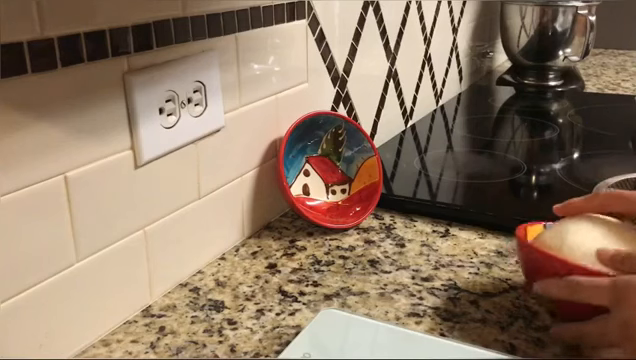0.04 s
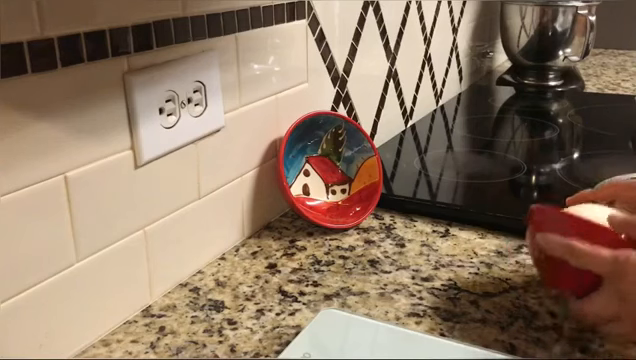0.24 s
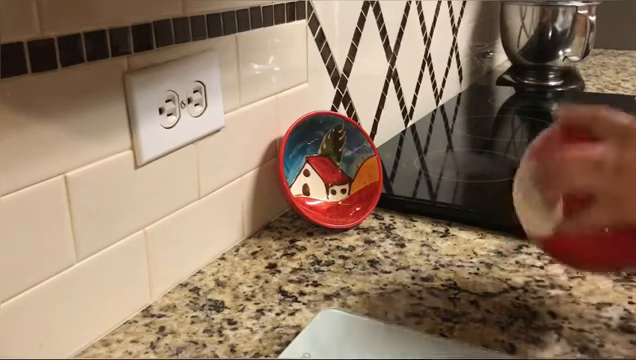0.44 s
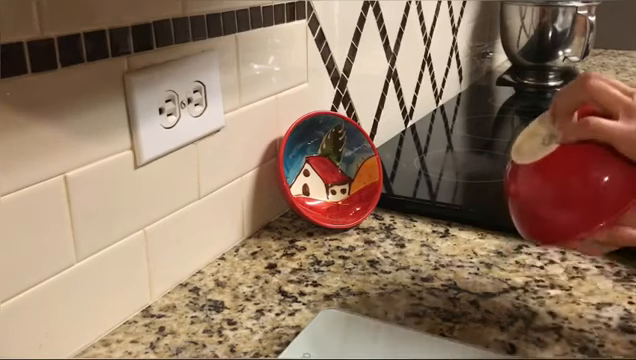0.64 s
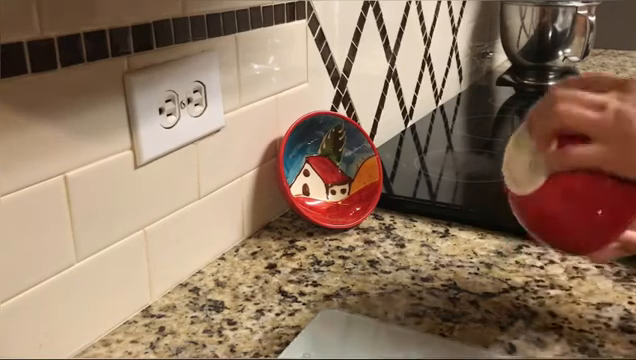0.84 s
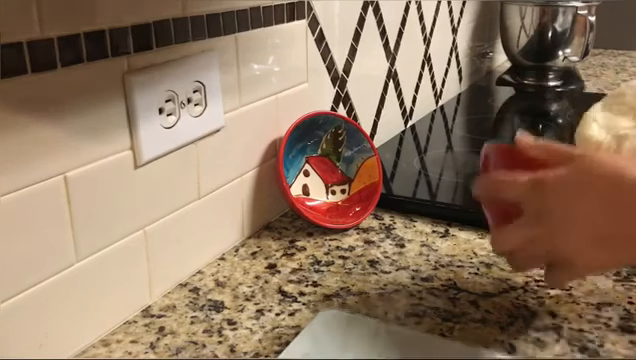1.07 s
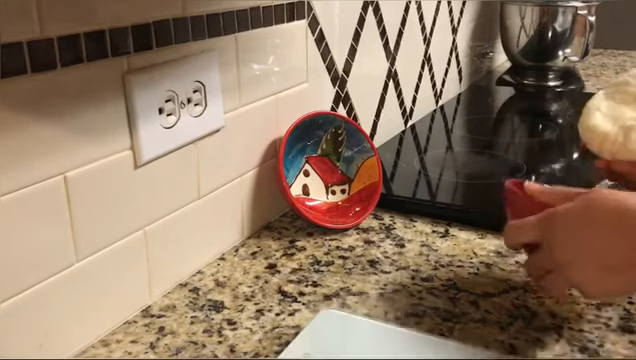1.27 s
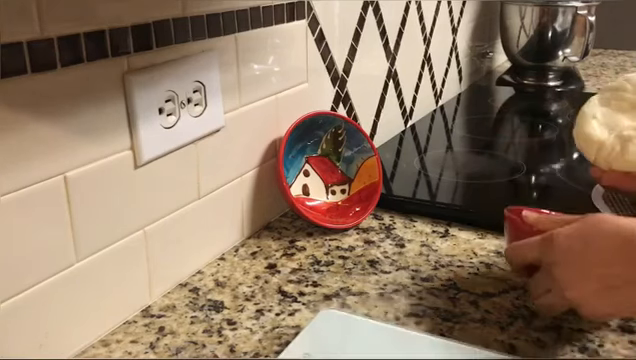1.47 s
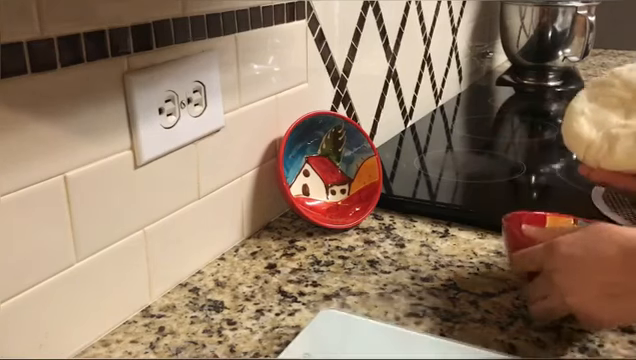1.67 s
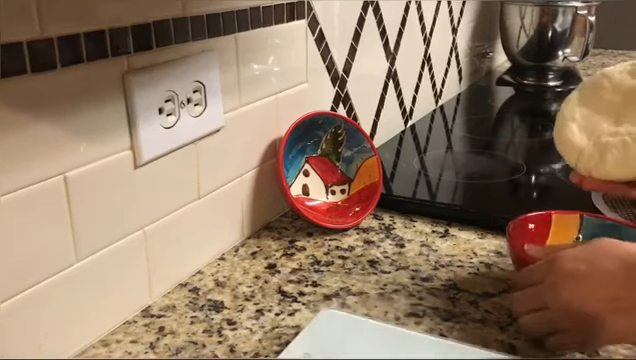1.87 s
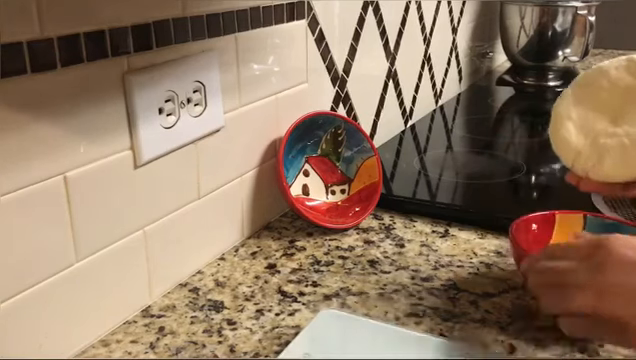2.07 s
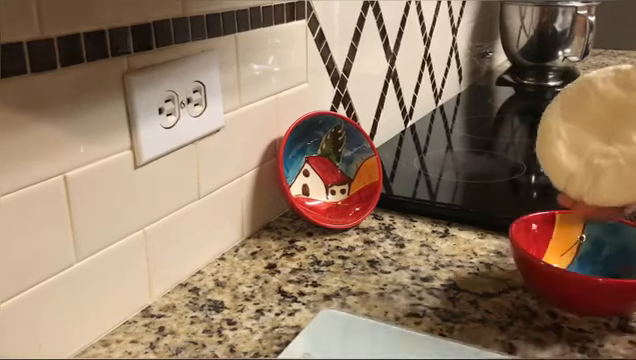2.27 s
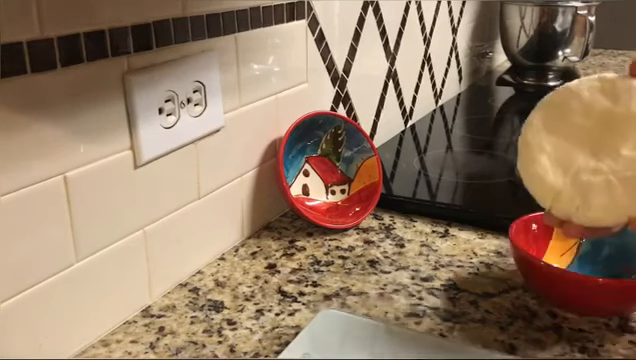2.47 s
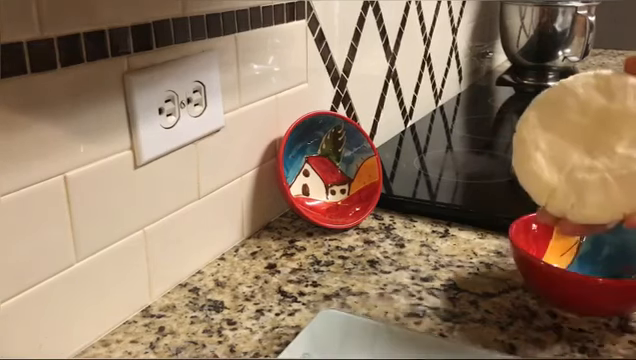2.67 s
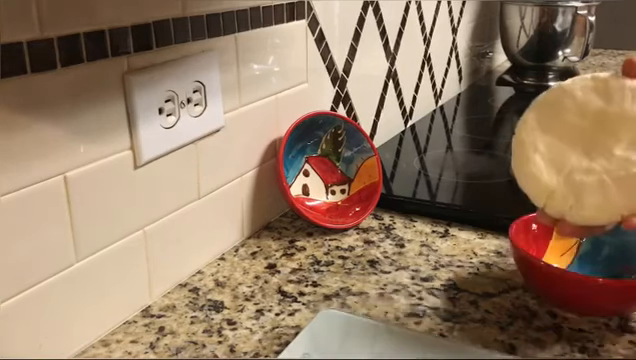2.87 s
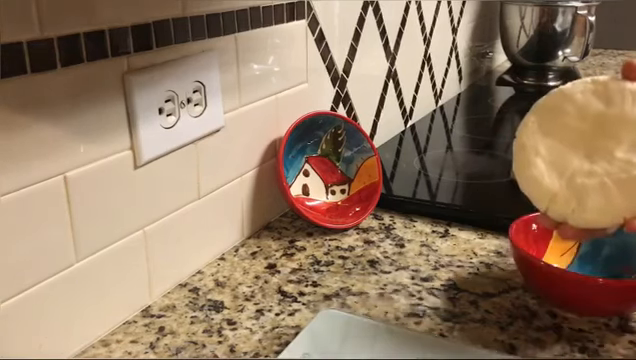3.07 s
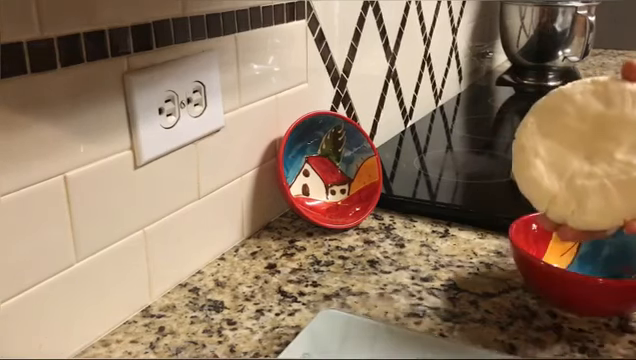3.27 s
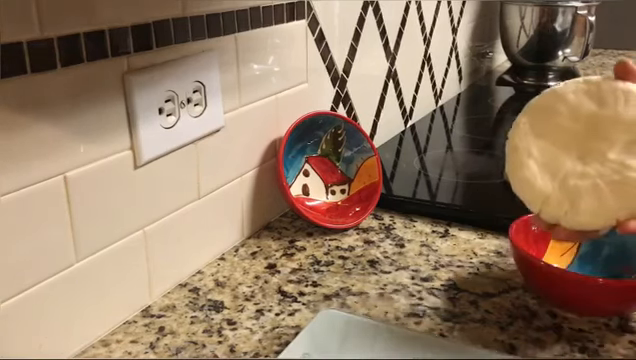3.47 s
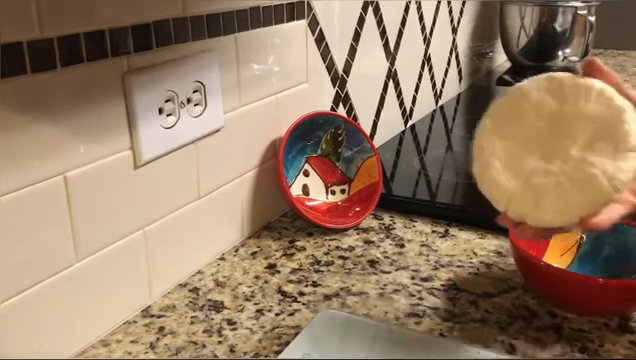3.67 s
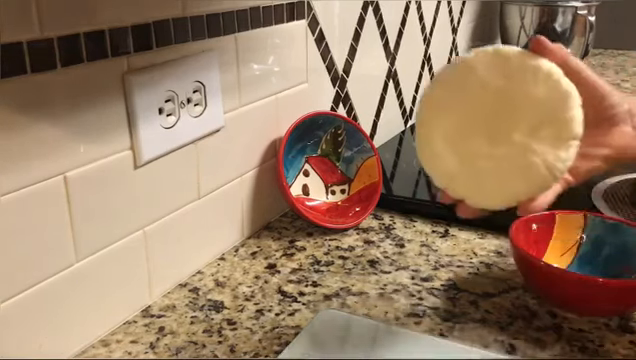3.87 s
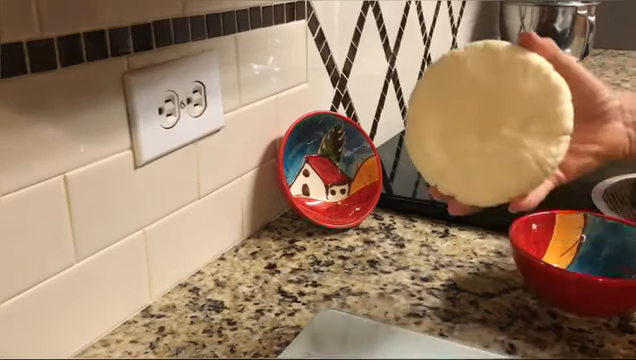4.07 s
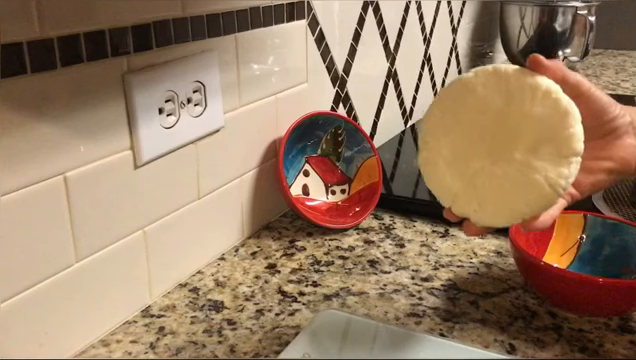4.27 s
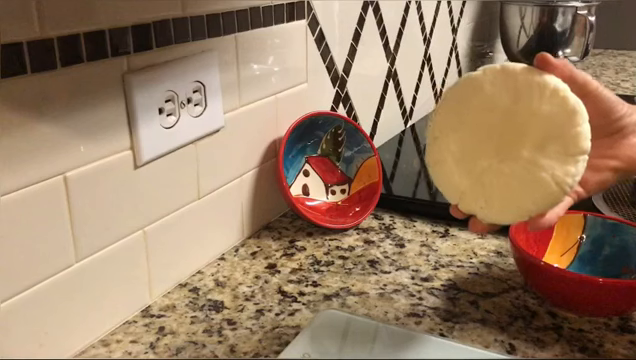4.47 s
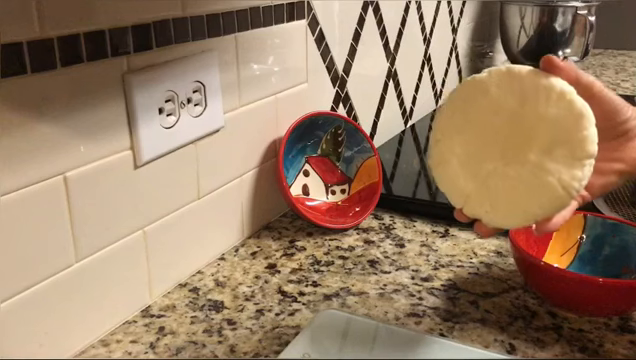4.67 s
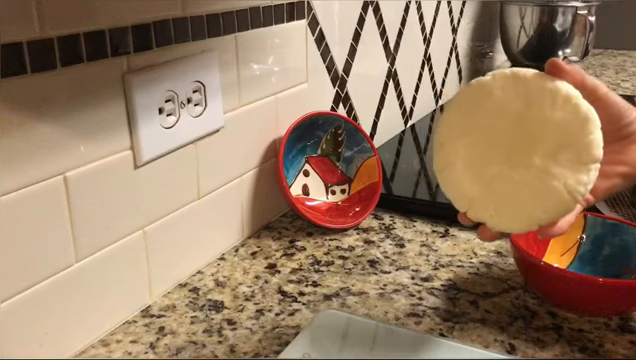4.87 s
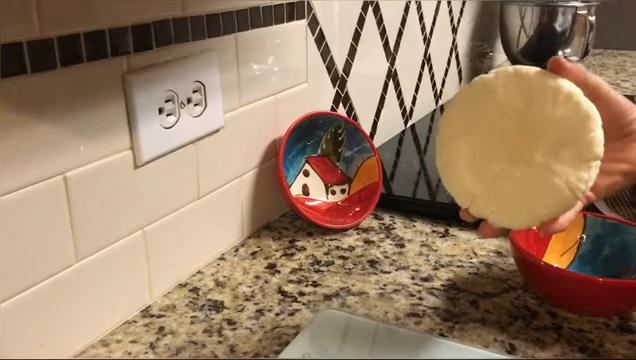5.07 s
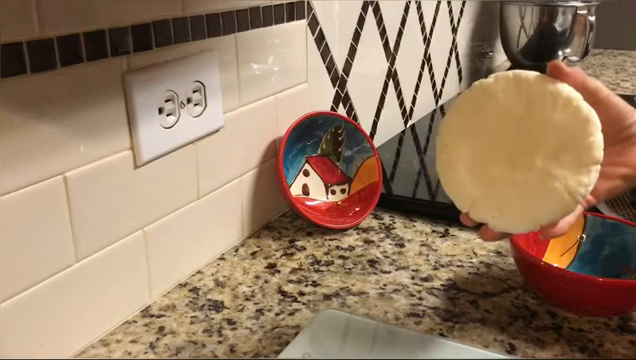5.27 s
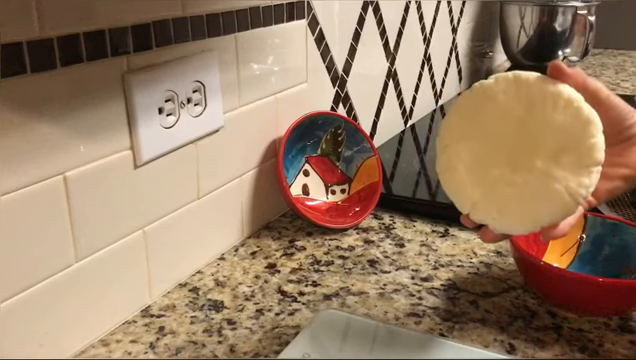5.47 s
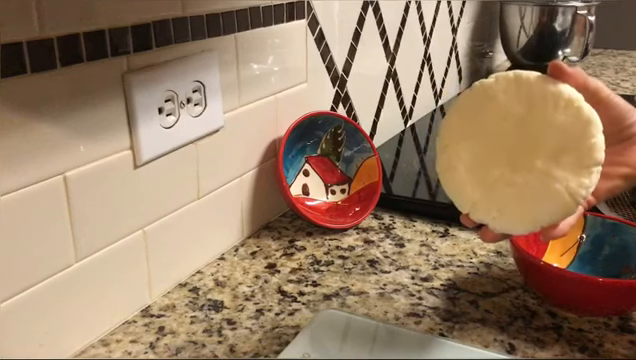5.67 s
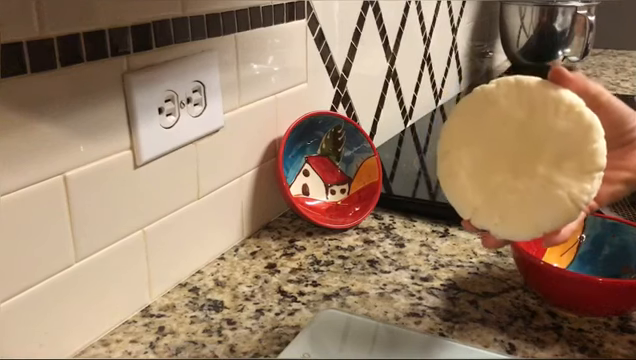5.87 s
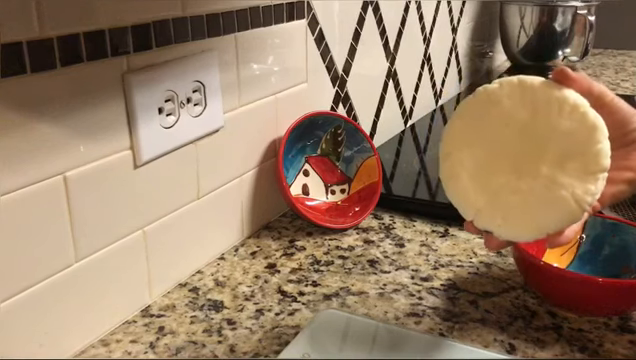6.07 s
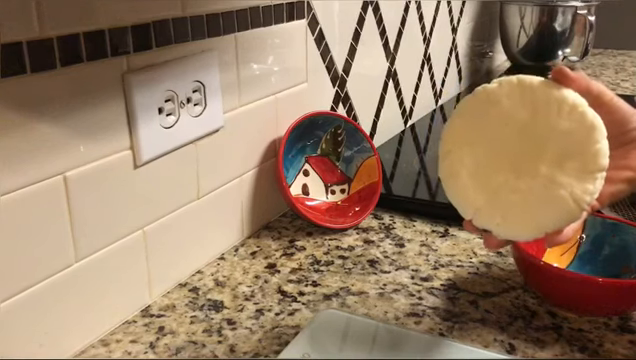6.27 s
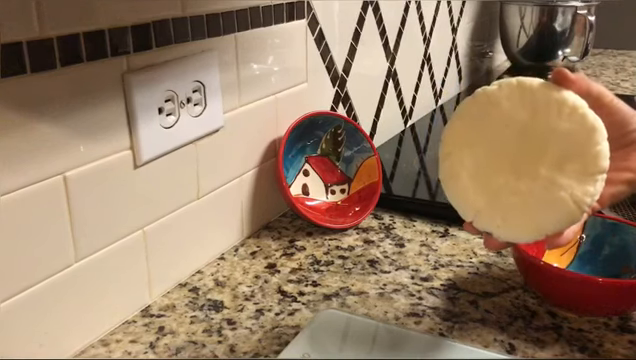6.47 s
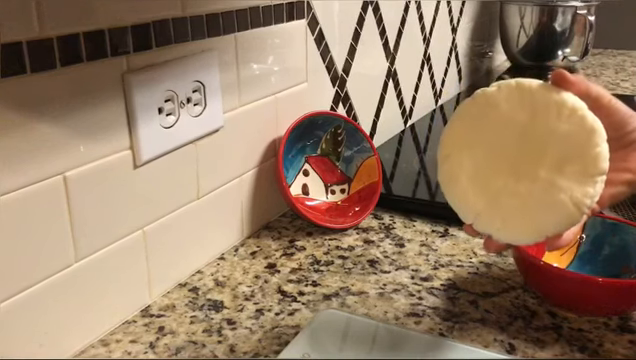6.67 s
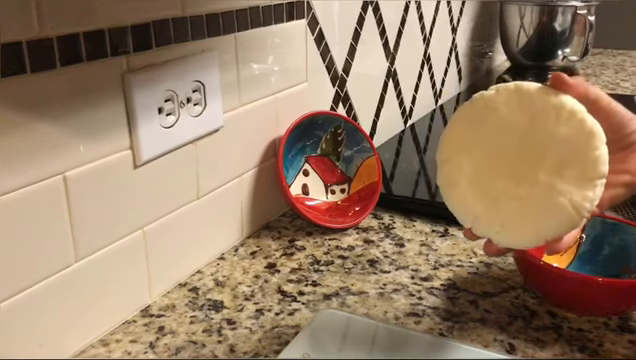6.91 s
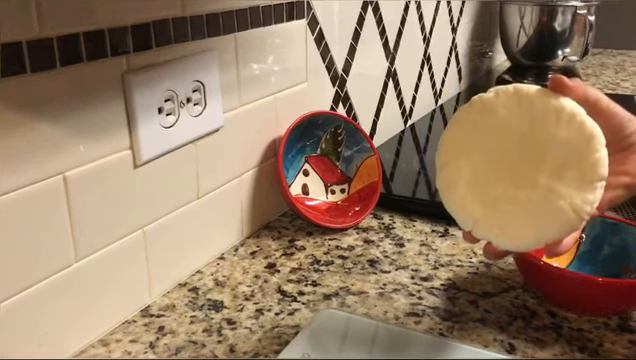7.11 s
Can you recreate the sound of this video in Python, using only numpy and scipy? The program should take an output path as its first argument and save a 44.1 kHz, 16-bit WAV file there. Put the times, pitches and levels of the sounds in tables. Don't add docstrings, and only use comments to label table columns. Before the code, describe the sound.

A ceramic bowl clatters onto a stone counter after soft cheese pops free, with close air puffs, hand rustle, fridge hum and later dry ticks.

```python
import sys
import numpy as np
from scipy import signal
from scipy.fft import rfft, irfft
from scipy.io import wavfile
from scipy.ndimage import uniform_filter1d

SR = 44100
rng = np.random.default_rng(int(sys.argv[2]) if len(sys.argv) > 2 else 0)


def volts_from_db(level):
    exponent = np.asarray(level, float) / 20
    return 10 ** exponent


def output_pcm(signal):
    pcm = np.clip(np.atleast_2d(signal).T, -1, 1) * 32767
    wavfile.write(sys.argv[1], SR, np.round(pcm).astype(np.int16))


N = 314874


def level(x, db):
    return x * volts_from_db(db) / np.sqrt(np.mean(x ** 2))


def band(x, lo_hz, hi_hz, order=2):
    sos = signal.butter(order, [lo_hz, min(hi_hz, .45 * SR)], "band", fs=SR, output="sos")
    return signal.sosfilt(sos, x)


def hiss(lo_hz, hi_hz, size=N):
    return level(band(rng.standard_normal(size), lo_hz, hi_hz), 0)


def fading(size, t60_s):
    return volts_from_db(-60 * np.arange(size) / SR / t60_s)


def dying(size, ms):
    return np.exp(-np.arange(size) / (ms * SR / 1000))


def curve(tables, column):
    t = np.arange(N) / SR
    gain = np.zeros(N)
    for rows in map(np.transpose, tables):
        gain += volts_from_db(np.interp(t, rows[0], rows[column], -200, -200))
    return gain


def swells(rows):
    t = np.arange(N) / SR
    power = np.zeros(N)
    for s, db, rise, fade in rows:
        power += volts_from_db(2 * db) * np.exp(-((t - s) / np.where(t < s, rise, fade)) ** 2)
    return np.sqrt(power)


def wander(rate_hz):
    hold = int(SR / rate_hz)
    steps = np.repeat(rng.standard_normal(N // hold + 1), hold)
    return uniform_filter1d(steps, hold)[:N]


def add(out, s, x):
    i = int(s * SR)
    out[i:i + len(x)] += x[:N - i]


def modes(table, scatter_db, rise_ms=0.33, size=SR // 2):
    hz, db, t60 = np.transpose(table)[:, :, None]
    t = np.arange(size) / SR
    gain = volts_from_db(db + scatter_db * rng.standard_normal(hz.shape))
    gain = gain * (-1) ** (np.arange(len(hz))[:, None] + rng.integers(2))
    tones = gain * np.sin(2 * np.pi * hz * t) * np.exp(-np.log(1000) * t / t60)
    return np.tanh(t * 1000 / rise_ms) * np.sum(tones, axis=0) / np.sqrt(np.sum(gain ** 2))


def burst(ms, size=2048):
    x = rng.standard_normal(size) ** 3 * dying(size, ms)
    return x / np.sqrt(np.sum(x ** 2))


# (f/Hz, level/dB)
MOTOR_TONES = [(49.25, -43.5), (147.74, -58.5), (250, -76), (359.5, -75)]
# (t/s, f/Hz)
SECOND_MOTOR = [(0, 150.22), (2, 150.15), (3.2, 150.34), (7.14, 150.34)]
# (f/Hz, level/dB per Hz)
ROOM_HISS = [(40, -2.5), (70, -1), (110, -11.5), (200, -11.5), (300, -15.5), (360, -13), (440, -22),
             (600, -19.5), (1000, -30), (1700, -32.5), (3000, -39), (9000, -42.5), (15500, -47.5),
             (16200, -69.5)]
# (f/Hz, width/Hz, level/dB)
WHIRS = [(576, 20, -80.5), (907, 39, -83), (1233, 10, -82), (1330, 10, -77), (1380, 120, -82.5),
         (1444, 35, -80), (1530, 22, -89)]


def fridge():
    t = np.arange(N) / SR
    null_s = 4.175
    out = np.zeros(N)
    for hz, db in MOTOR_TONES:
        out += volts_from_db(db) * np.sqrt(2) * np.sin(2 * np.pi * hz * (t - null_s))
    turns = np.cumsum(np.interp(t, *np.transpose(SECOND_MOTOR))) / SR
    turns = turns - np.interp(null_s, t, turns)
    out -= volts_from_db(-61.5) * np.sqrt(2) * np.sin(2 * np.pi * turns)
    hz, db = np.transpose(ROOM_HISS)
    colour = volts_from_db(np.interp(np.log(np.fft.rfftfreq(N, 1 / SR) + 1), np.log(hz), db))
    room = irfft(rfft(rng.standard_normal(N)) * colour, N)
    out += room * volts_from_db(-64.5) / np.std(band(room, 200, 16000))
    for hz, width, db in WHIRS:
        out += volts_from_db(db) * hiss(hz - width / 2, hz + width / 2)
    return out


# (t/s, peak level/dB, build-up/s, fade/s)
GUSTS = [(.08, -30, .2, 0.084), (.36, -24.5, .07, 0.076), (.7, -32, .2, 0.36), (1.2, -32, .12, 0.11),
         (1.95, -36, .12, 0.25), (2.36, -29.5, .2, 0.091), (5.05, -36, .3, 0.074), (5.45, -45.5, .07, .06)]
# (t/s, pressure from -1 to 1, half width/ms)
AIR_SURGES = [(.18, -0.072, 45), (0.311, 0.187, 27), (0.377, 0.4, 25), (0.45, -0.22, 38),
              (0.511, -0.14, 58), (0.641, 0.12, 74), (1.301, -0.13, 51), (1.392, 0.11, 81),
              (2.221, -0.062, 35), (2.329, 0.086, 16), (2.399, -0.0066, 22), (2.482, 0.078, 33)]
# (t/s, drop level/dB, edge/ms, recovery/ms, crack level/dB)
SUCTION_POPS = [
    (0.2237, -12.5, 1.73, 18.5, -73),
    (1.3286, -11, 1.5, 13, -39),
]


def air():
    t = np.arange(N) / SR
    slow = level(band(hiss(4, 20), 3, 28), -0.91)
    still_air = volts_from_db(-44.5 + 4 * wander(3))
    flutter = volts_from_db(-26) * hiss(74, 180)
    out = np.hypot(swells(GUSTS), still_air) * (slow + flutter)
    for s, pressure, ms in AIR_SURGES:
        out += pressure * np.exp(-((t - s) * 1000 / ms) ** 2 / 2)
    for s, db, edge_ms, back_ms, crack_db in SUCTION_POPS:
        u = t[:SR // 2] * 1000
        add(out, s, -volts_from_db(db) * np.tanh((u / edge_ms) ** 2) * np.exp(-u / back_ms))
        crack = band(signal.unit_impulse(2048), 600, 2600, order=1)
        add(out, s + 0.0006, volts_from_db(crack_db + 32) * crack)
    return out


# (t/s, level/dB)
NAIL_SCRAPE = [(.08, -88), (.11, -69), (.15, -90), (.22, -71), (.28, -75), (.3, -69), (.308, -53),
               (.325, -62), (.35, -71)]
# (f/Hz, level/dB, 60 dB fade/s)
FULL_WALL = [(5900, 5, 0.026), (6000, -3, 0.04), (6310, 7, 0.019), (7000, -8, 0.034), (7900, 1, 0.033),
             (9020, 3, 0.042)]
# (t/s, level/dB)
FOOT_DRAG = [
    [(1.74, -69), (1.78, -69.5), (1.846, -55.5), (1.862, -68), (1.872, -58.5), (1.975, -57)],
    [(2.03, -61.5), (2.066, -59), (2.078, -65), (2.118, -62), (2.24, -80)],
]
# (f/Hz, level/dB, 60 dB fade/s)
FREE_WALL = [(5882, 0.5, 0.075), (5925, -8.5, 0.062), (6800, -16.5, 0.05), (7200, -14, .03),
             (6985, -12.5, 0.1), (7520, -8, .055), (7620, -17.5, .05), (7700, -11, .05), (8930, -15, 0.062),
             (9290, -11, 0.053), (9380, -11.5, .04), (9400, -17.5, .04), (9934, -12.5, .055),
             (10840, -21.5, 0.042), (12900, -17, .045), (13030, -21, .05), (13400, -19.5, .045),
             (14670, -27, .03)]


def scraping():
    out = np.zeros(N)
    for tables, wall in ((FOOT_DRAG, FREE_WALL), ([NAIL_SCRAPE], FULL_WALL)):
        grains = level(rng.standard_normal(N) * volts_from_db(6.8 * wander(70)), -0.5)
        grit = grains * curve(tables, 1)
        response = band(modes(wall, .5), 4100, 15500)
        response = response / np.sqrt(np.sum(response ** 2))
        out += signal.fftconvolve(grit, response)[:N]
        out += volts_from_db(-12.5) * band(grit, 5500, 14000)
    add(out, 0.304, volts_from_db(-52.5) * signal.fftconvolve(burst(6), modes(FULL_WALL, 1.5)))
    return out


# (f/Hz, 60 dB fade/s, level/dB)
WALL_TAIL = [(238, 0.41, -7.5), (500, 0.57, 3.5), (930, 0.61, -2), (1940, 0.44, 2), (3900, 0.32, -3),
             (8200, 0.3, -1), (14000, .2, 0)]


def walls(x):
    t = np.arange(SR) / SR
    gap_s = 0.0065
    tail = np.zeros(SR)
    for hz, t60, db in WALL_TAIL:
        noise = hiss(hz / np.sqrt(2), hz * np.sqrt(2), size=SR)
        tail += volts_from_db(db) * np.sqrt(hz / 1000) * noise * fading(SR, t60)
    tail = tail * np.tanh((t / gap_s) ** 2)
    return signal.fftconvolve(x, tail / np.sqrt(np.sum(tail ** 2)))[:N]


# (t/s, brushing level/dB, build-up/s, fade/s, skin hiss level/dB over the brushing)
HAND_MOVES = [(.33, -72, 0.13, 0.061, 1.5), (.57, -66.5, 0.13, 0.14, -3), (1.02, -73.5, .12, 0.26, -2),
              (1.55, -84, .1, 0.19, 2), (2.22, -66, .12, .12, -2.5), (2.4, -77, .04, .08, -5),
              (3.78, -78, .15, .15, -6)]
# (t/s, peak level/dB, f/Hz, length/ms)
FINGER_CLICKS = [(0.1954, -51, 2540, 4), (0.62, -46, 2990, 7.3), (0.65, -39.5, 3400, 4.4),
                 (1.3773, -53, 4300, 3), (1.935, -44.5, 4600, 3), (2.2422, -45, 2745, 4),
                 (2.3856, -45, 3470, 6.7), (3.5982, -52, 2620, 4), (3.699, -62, 2890, 3.4)]
# (t/s, level/dB, f/Hz, length/ms)
FINGER_SQUEAKS = [(.18, -53, 640, 19), (.25, -56, 566, 24), (.294, -44.5, 538, 16), (.306, -44, 583, 30),
                  (.8, -70, 7500, 24.5), (1.903, -43, 449, 47), (6.09, -80, 4000, 65),
                  (6.134, -78, 4920, 29)]


def hands():
    motion = swells([row[:4] for row in HAND_MOVES])
    skin = swells([(s, db + skin_db, rise, fade) for s, db, rise, fade, skin_db in HAND_MOVES])
    out = motion * volts_from_db(8) * volts_from_db(4.2 * wander(30)) * hiss(170, 1100)
    out += motion * level(volts_from_db(2 * wander(40) + 2 * wander(370)) * hiss(1500, 5000), 0)
    out += skin * level(volts_from_db(1.5 * wander(40) + 2 * wander(250)) * hiss(5000, 12000), 0)
    for s, db, hz, ms in FINGER_CLICKS:
        click = hiss(.75 * hz, 1.4 * hz, size=2048)
        add(out, s, volts_from_db(db - 13) * dying(2048, ms) * click)
    for s, db, hz, ms in FINGER_SQUEAKS:
        u = np.arange(int(ms * SR / 1000))
        unsteady = np.cumsum(0.055 * rng.standard_normal(len(u)))
        squeak = np.sin(2 * np.pi * hz * u / SR + unsteady)
        add(out, s, 2 * volts_from_db(db - 3) * np.hanning(len(u)) * squeak)
    return out


# (t/s, blow level/dB, rattle level/dB over the blow, hardness level/dB over the blow)
FOOT_CONTACTS = [(1.628, -18, -0.5, -25.5), (1.638, -26.5, 3.5, -30), (1.733, -21.5, -5, -32.5),
                 (1.747, -24, -16, -33), (1.754, -26.5, 1, -37), (1.762, -30, 5.5, -30),
                 (1.981, -13.5, 9, -16), (1.987, -13.5, -14.5, -14), (1.991, -12, 17, -6),
                 (2.002, -23.5, 11.5, -6), (2.011, -13.5, 6, -17.5), (2.024, -25, 19.5, -22),
                 (2.044, -28.5, 11, -23.5), (2.075, -33.5, 18, -21), (2.114, -39, 3, -25)]
# (f/Hz, level/dB, 60 dB fade/s)
SLAB_FLAT = [(95, -11.5, 0.04), (159, -7.5, .1), (273, -1, 0.058), (374, -7.5, 0.12), (430, -9.5, 0.08),
             (540, -4.5, .07)]
# (f/Hz, level/dB, 60 dB fade/s)
SLAB_TIPPED = [(95.26, -13.5, 0.081), (191, -3.5, 0.14), (265, -3.5, 0.083), (380, -3, 0.077),
               (430, -2.5, .07), (560, -9, .07)]
# (f/Hz, level/dB, 60 dB fade when let go/s)
BOWL_BODY = [(575, -16, .05), (612, -15, .05), (682, -13, .06), (797, -14, .06), (877, -9, .06),
             (993, -9, .06), (1037, -14, .06), (1084, -4, .13), (1260, -10, .07), (1421, -12, .05),
             (1475, -14, .05), (1694, -16, .07)]
# (f/Hz, level/dB, 60 dB fade/s)
BOWL_RIM = [(2130, 0.5, .04), (2090, -0.5, 0.055), (2300, -6.5, 0.026), (2517, -3, 0.078), (2870, -10, .05),
            (2940, -14, .05), (3200, -13.5, 0.071)]


def bowl():
    out = np.zeros(N)
    for s, blow_db, rattle_db, hard_db in FOOT_CONTACTS:
        if s < 1.9:
            slab, thud_db, rim_db, grip = SLAB_FLAT, 0.5, -47, 0.29
            lo_hz, hi_hz, order, clatter_db = 600, 1450, 3, -2.5
        else:
            slab, thud_db, rim_db, grip = SLAB_TIPPED, -7, -11.5, 1
            lo_hz, hi_hz, order, clatter_db = 700, 2300, 1, -20
        body = volts_from_db(blow_db + thud_db) * modes(slab, 1.5, 2.5)
        body += volts_from_db(blow_db + 3) * modes(np.array(BOWL_BODY) * [1, 1, grip], 1.5, .9)
        add(out, s, band(body, 70, 1900, order=3))
        add(out, s, volts_from_db(blow_db + rim_db + 0.5) * band(modes(BOWL_RIM, 2, 1.8), 1600, 3200))
        rattle = burst(3.1)
        ring = signal.fftconvolve(rattle, band(modes(FREE_WALL, 1.5), 4500, 15500))
        add(out, s, volts_from_db(blow_db + hard_db) * ring)
        add(out, s, volts_from_db(blow_db + hard_db + 11) * band(rattle, 2500, 13500))
        clatter = band(hiss(lo_hz, hi_hz, size=SR // 4), lo_hz, hi_hz, order=order)
        add(out, s, volts_from_db(blow_db + rattle_db + clatter_db) * fading(SR // 4, 0.051) * clatter)
    add(out, 2.02, volts_from_db(-41.5) * fading(SR, 0.6) * hiss(200, 1300, size=SR))
    hum = hiss(1070 - 45, 1070 + 45, size=2 * SR)[SR:]
    add(out, FOOT_CONTACTS[8][0], volts_from_db(-29.5) * fading(SR, 0.59) * hum)
    return out


# (t/s, level/dB, snap level/dB over it, sparkle level/dB over it)
DRY_TICKS = [(2.815, -57, -8, -12), (3.025, -34, 5, -2), (3.306, -38, -19, -1), (5.219, -50.5, -30, -16),
             (5.314, -28, -3.5, -6.5), (5.499, -29.5, -5.5, -16.5)]
# (f/Hz, level/dB, 60 dB fade/s)
HOLLOW_BOX = [(588, 2.5, 0.013), (720, -4, 0.03), (970, 4.5, 0.017), (1246, 11.5, 0.035),
              (1455, 12.5, 0.017), (1750, 3, 0.024), (2300, 2.5, 0.022), (3418, 2, 0.017), (5000, 8, 0.016),
              (6540, -19, .013)]


def ticks():
    box, snap, around = np.zeros((3, N))
    click = signal.unit_impulse(2048)
    for s, hollow_db, snap_db, sparkle_db in DRY_TICKS:
        ms = 3.46 - 0.25 * (hollow_db + 30)
        fade = dying(2048, ms)
        add(box, s, volts_from_db(hollow_db + 9) * modes(HOLLOW_BOX, 1.5, 1.5, size=4096))
        parts = (
            (-2.5, 600, 4000, 1),
            (snap_db - 2, 4000, 7000, -1),
            (sparkle_db + 1.5, 7000, 15000, 1),
        )
        for over_db, lo_hz, hi_hz, sign in parts:
            db = hollow_db + over_db
            add(snap, s, fade * volts_from_db(db) * hiss(lo_hz, hi_hz, size=2048))
            even = level(band(click, lo_hz, hi_hz), db)
            add(around, s, sign * even * np.sqrt(np.mean(fade ** 2)))
    return band(np.array([box, snap, around]), 410, 19000, order=4)


def scene():
    near = bowl() + scraping()
    box, snap, around = ticks()
    tail = walls(volts_from_db(-13) * near + volts_from_db(-14) * around + volts_from_db(-15.5) * box)
    return (near + box + snap + tail + hands() + air() + fridge())[None]


def low_pass(x):
    return signal.sosfilt(signal.butter(12, 16540, fs=SR, output="sos"), x)


def record(dry):
    top_cut = signal.ellip(8, .2, 60, 15800, fs=SR, output="sos")
    return low_pass(signal.sosfilt(top_cut, dry))


dry = scene()
out = record(dry)
output_pcm(out)
```